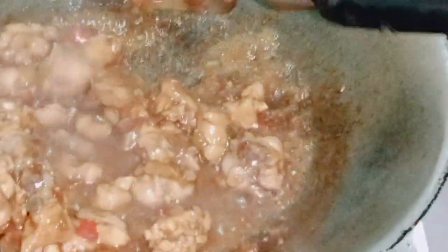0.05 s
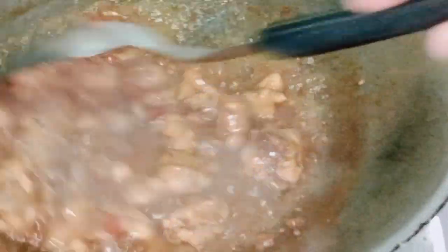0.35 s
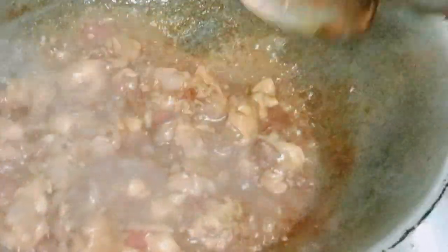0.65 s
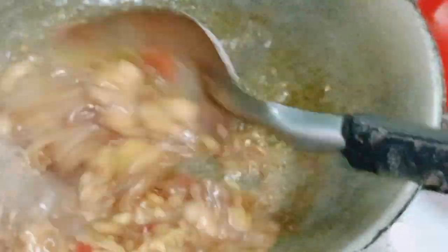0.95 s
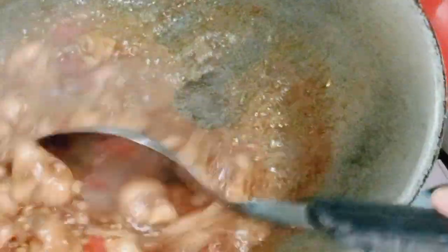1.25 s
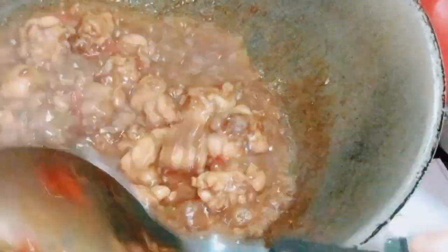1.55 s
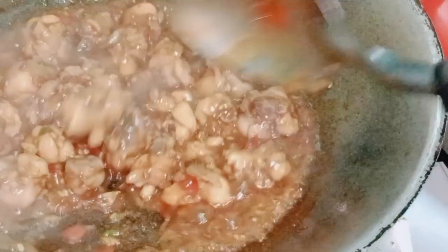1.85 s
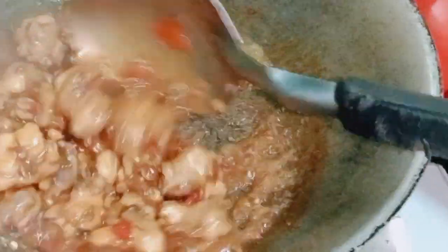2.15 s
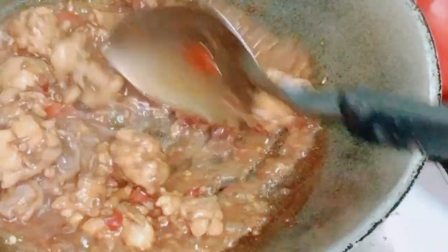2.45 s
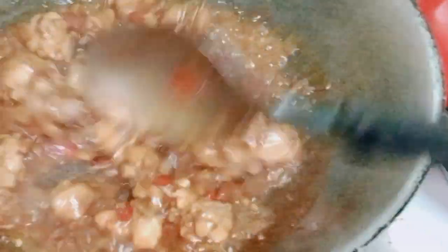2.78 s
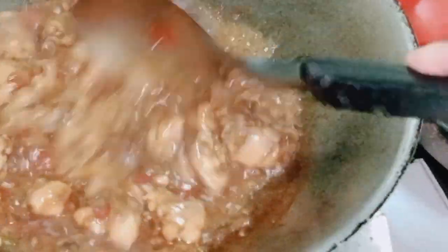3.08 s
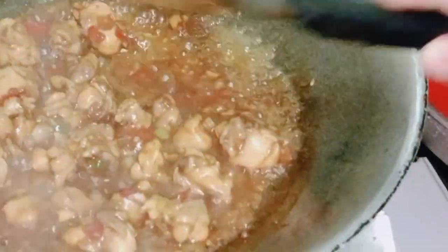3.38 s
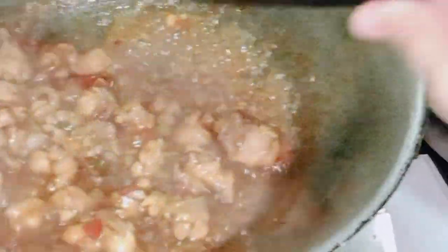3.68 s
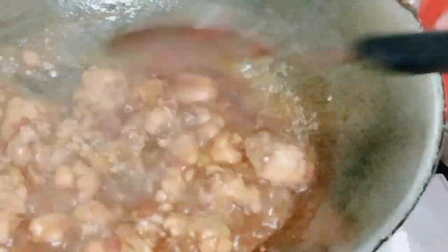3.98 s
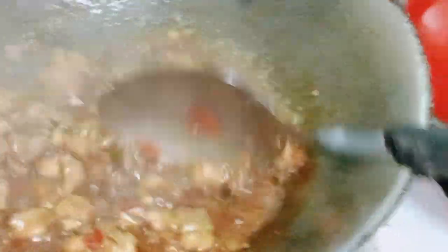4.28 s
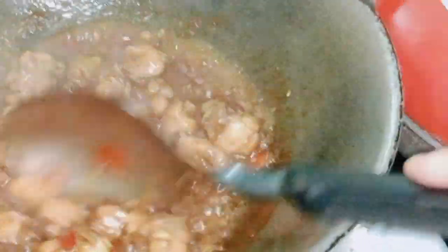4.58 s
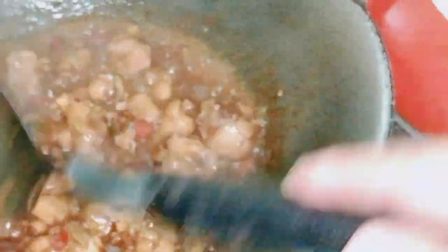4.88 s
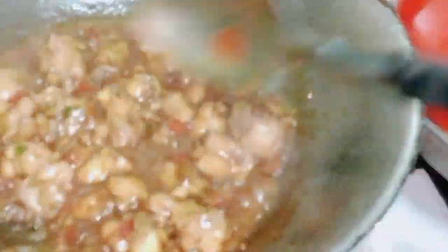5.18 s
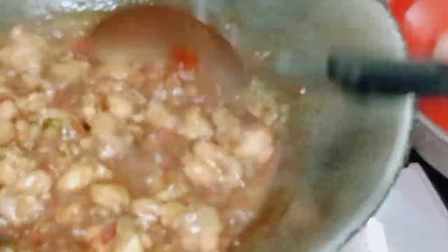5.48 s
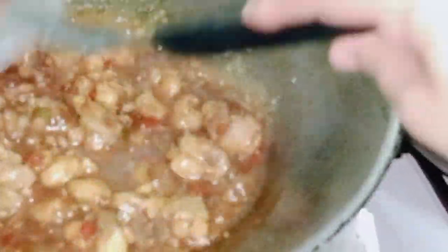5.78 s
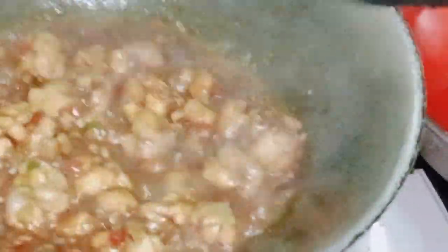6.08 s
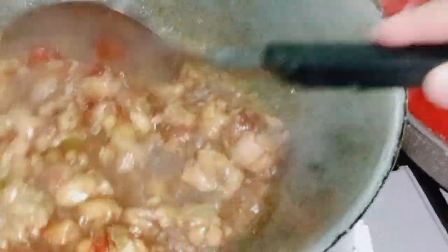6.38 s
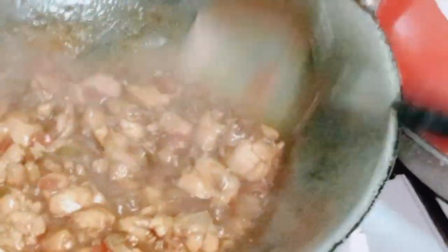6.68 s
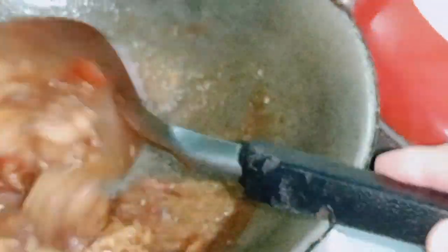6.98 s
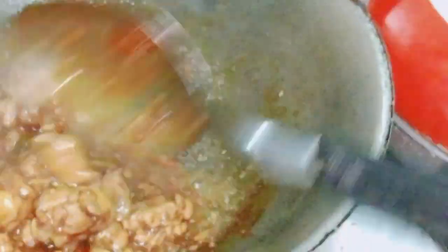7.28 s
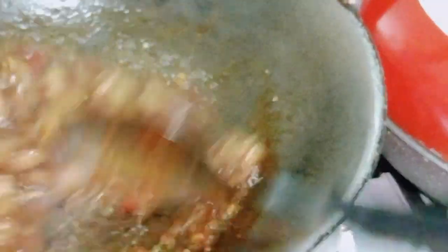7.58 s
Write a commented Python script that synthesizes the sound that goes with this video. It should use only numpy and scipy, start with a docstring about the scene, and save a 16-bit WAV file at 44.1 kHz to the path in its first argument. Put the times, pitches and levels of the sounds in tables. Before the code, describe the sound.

A steel ladle stirs chicken in a wok, close to the microphone in a small kitchen. Light knocks and a scrape come first, then a cluster of louder clanks. Single ringing knocks follow about a second apart, and more knocks and scrapes close the stirring. Lumps of meat plop into the sauce now and then. Underneath, soft bubbling and a faint high sizzle swell with the strokes.

```python
"""Light knocks and a scrape come first: a steel ladle stirs chicken in a wok, close by, in a small kitchen.
Each knock makes the pan ring, less when the ladle presses on its bare wall, and the room echoes.
The ladle scrapes by sticking and slipping over the steel, and lumps of meat plop into the sauce.
Underneath, bubbles burst softly and fat sizzles at the hot rim; both swell when the ladle stirs."""
import sys
import numpy as np
from scipy import signal
from scipy.io import wavfile

SR = 44100
rng = np.random.default_rng(int(sys.argv[2]) if len(sys.argv) > 2 else 0)


def master_out(mix):
    """Clip the mix to full scale and print it as 16-bit PCM to the path in sys.argv[1]."""
    frames = np.transpose(np.atleast_2d(mix))
    ceiling = np.clip(frames, -1, 1)
    pcm = np.round(ceiling * 32767).astype(np.int16)
    wavfile.write(sys.argv[1], SR, pcm)


N = 337365

# The steady rush of the kitchen. Each row: frequency in Hz, relative level in dB.
RUSH_TONE = [(25, -50), (50, -18), (100, -2), (250, -1.5), (330, 6), (400, 4.5), (480, 1.5), (800, 1.5),
             (1400, -1.5), (3000, -50)]
# Echoes of pan and kitchen. Each row: frequency in Hz, seconds to fade by 60 dB.
ECHO_TIMES = [(100, 0.51), (250, 0.35), (700, 0.3), (1800, 0.38), (5000, .31), (13000, 0.43)]
# Sweeps of the ladle through the sauce. Each row: start in seconds, length in seconds, squelch in dB.
SAUCE_SWEEPS = [(0.080, 0.37, -55.5), (0.598, 0.27, -50), (0.900, 0.72, -55.5), (1.763, 0.64, -59),
                (2.150, 0.94, -60), (2.942, 0.17, -58), (4.053, 0.36, -63), (4.424, 0.23, -61.5),
                (5.01, 0.54, -60.5), (6.525, 0.49, -49.5), (6.94, 0.37, -58), (7.38, 0.29, -47)]
# Fat frying at the rim. Each row: frequency in Hz, relative level in dB.
SIZZLE_TONE = [(1000, -32), (3500, -20), (4400, -19.5), (5200, -24.5), (6100, -22.5), (6400, -2), (7500, 1),
               (8900, -1.5), (9400, -6), (10100, -3), (11500, -11), (12700, -6.5), (14000, -14),
               (15400, -9.5)]
# Small bubbles bursting in the sauce. Each row: frequency in Hz, relative level in dB.
BUBBLE_TONE = [(300, 0.5), (900, -24), (1250, -8), (1550, -1), (2100, -5.5), (2650, -0.5), (3000, -6),
               (3500, -8.5), (4600, -43)]
# Meat dropping into the sauce. Each row: start in seconds, pitch in Hz, level in dB.
MEAT_DROPS = [(0.283, 326, -71), (1.33, 355, -46), (1.885, 480, -50), (2.226, 122, -60),
              (2.285, 368, -50.5), (2.470, 131, -72), (4.26, 330, -49.5), (4.601, 301, -65.5),
              (6.779, 358, -46), (7.004, 194, -66.5), (7.560, 184, -44.5)]
# The wok's own ringing notes. Each row: pitch in Hz, relative level in dB, seconds to fade by 60 dB.
WOK_NOTES = [(178, -4, 0.55), (240, -32, 1), (510, 0.5, 0.82), (632, 5.5, 0.4), (747, 11, 0.33),
             (970, 9.5, 0.49), (1040, -7, 0.62), (1077, 16, 0.073), (1213, 6, 0.53), (1296, 8, 0.23),
             (1410, 6.5, 0.36), (1718, 11, 0.21), (1990, 3, 0.55), (2263, 6, 0.17), (4330, -2.5, 0.37),
             (7250, -10.5, 0.15), (7434, -13, .2)]
# Pan and ladle, struck through food. Each row: frequency in Hz, relative level in dB.
FOOD_TONE = [(20, -80), (60, -16.5), (120, -15.5), (190, -7), (420, 1.5), (700, 4.5), (1100, 6),
             (1600, -4.5), (2400, -13), (3300, -21.5), (4100, -14.5), (5200, -13), (7300, -3),
             (15500, -23.5)]
# The wok's damped notes while the ladle presses on its bare wall.
# Each row: pitch in Hz, width in Hz, relative level in dB.
WALL_PEAKS = [(246, 230, -1.5), (631, 94, 7), (985, 75, -8), (1590, 190, -7.5), (1768, 57, -2.5),
              (2064, 123, -8), (2466, 236, -5), (2980, 190, -9), (3230, 84, -10.5), (3270, 68, -7),
              (3720, 180, -9), (4430, 110, -10.5), (6850, 2840, -11.5), (12600, 5600, -26)]
# Drags of the ladle. Each row: start in seconds, length in seconds, level in dB, low thud in dB,
# bright tick in dB, share of bare wok wall touched from 0 to 1.
LADLE_DRAGS = [(0.124, 0.094, -45, 6.5, 7.5, 0.26), (0.587, 0.18, -52, 5.5, -3.5, 0.94),
               (1.275, 0.11, -44.5, 12, -8.5, 0.05), (1.402, 0.18, -55, 19, -2, 0.06),
               (1.884, 0.077, -55, 21, -21, 0.2), (2.273, 0.082, -49, 20.5, -4.5, 0.15),
               (3.343, 0.07, -57, 2, 8, 0.4), (4.523, 0.14, -66.5, 20.5, -9, 0),
               (5.254, 0.073, -54.5, 10, 5.5, 1), (6.162, 0.071, -46.5, 4, -1, 0.6),
               (6.542, 0.19, -59.5, 13.5, 5, 0.5), (6.766, 0.14, -45.5, 14.5, -8.5, 0.19),
               (7.512, .11, -38, 16, -14, 0.08)]
# Knocks of the ladle. Each row: start in seconds, level in dB, low thud in dB, bright tick in dB,
# share of bare wok wall touched from 0 to 1, pitch in Hz that the struck spot favours.
LADLE_KNOCKS = [(0.072, -51.5, 11.5, -1.5, 0.75, 655), (0.198, -44, -4, -9, 0.43, 730),
                (0.575, -62, 20.5, 6, 0.4, 2260), (1.163, -50.5, 7, -9, 0.6, 563),
                (1.19, -41, 7, -7.5, 0.63, 620), (1.261, -32.5, 15.5, -9, 0.26, 820),
                (1.380, -42, 17, -25, 0, 640), (1.5009, -26.5, 5, 5, 0.12, 1070),
                (1.8624, -42.5, 8.5, 7.5, .87, 1700), (2.890, -81.5, -4, 28.5, .7, 1890),
                (3.288, -49, 2.5, 8.5, 0.77, 676), (3.356, -41, 4.5, -9, 0.59, 713),
                (3.7362, -27.5, 5, -2, 0.35, 2280), (4.256, -49.5, 6, -12, 0.21, 786),
                (4.884, -29, 7.5, 4, 0.04, 980), (5.2318, -54, 8, 19, 1, 2060),
                (5.299, -55.5, 6, 6.5, 1, 2140), (5.7438, -31.5, 6.5, 0, 0.28, 752),
                (6.157, -53, -6, 15, 1, 660), (6.510, -47.5, 6.5, 12.5, 0.98, 1770),
                (6.703, -75.5, -4, 19, .5, 2015), (6.758, -36, 10.5, -15, 0.1, 800),
                (6.843, -43, 17.5, -23, 0, 694), (7.3606, -26, 1, -5.5, 0.08, 745),
                (7.504, -44, 7, 2, 0.93, 1400), (7.535, -38, 13, -8, 0.1, 1410)]

RASP_PER_TICK = 0.42  # dB of mid rasp that come with each dB of bright tick


def amp(db):
    """Turns decibels into a number to multiply by."""
    return 10 ** (np.asarray(db) / 20)


def rms(x):
    """The average strength of a sound (root mean square)."""
    return np.sqrt(np.mean(x ** 2) + 1e-20)


def look_up(points, hz):
    """Reads between the rows of a (Hz, value) table, on a scale of octaves."""
    f, value = np.transpose(points)
    return np.interp(np.log(hz + 1), np.log(f + 1), value)


def add(mix, start_s, sound):
    """Mixes a sound in at its start time."""
    part = mix[max(round(start_s * SR), 0):][:len(sound)]
    part += sound[:len(part)]


def colour(x, *tones, size=4096):
    """Shapes a sound with (Hz, dB) tables, using a filter that never rings ahead of the sound."""
    hz = abs(np.fft.fftfreq(size, 1 / SR))
    log_gain = np.log(amp(sum(look_up(points, hz) for points in tones)))
    spectrum = np.exp(np.conj(signal.hilbert(log_gain)))
    taps = np.fft.ifft(spectrum).real[:size // 2]
    return signal.oaconvolve(x, taps)[:len(x)]


def resonate(x, hz, width_hz):
    """Picks out a narrow band around the moving pitch hz."""
    turn = np.exp(2j * np.pi * np.cumsum(hz) / SR)
    decay = np.exp(-np.pi * width_hz / SR)
    return 2 * (turn * signal.lfilter([1 - decay], [1, -decay], x / turn)).real


def clicks(count, per_s, spread_db):
    """Clicks at random times, a few of them large."""
    size = amp(spread_db * np.minimum(rng.exponential(1, count), 4)) * rng.choice([-1, 1], count)
    return size * (rng.random(count) < per_s / SR)


def kitchen(level_db=-72):
    """The soft rush of the stove and the room."""
    rush = colour(rng.standard_normal(N), RUSH_TONE)
    return amp(level_db) * rush / rms(rush)


def echoes(build_cycles=7):
    """Crowded echoes of pan and kitchen: low pitches swell later, and each fades at its own speed."""
    count = SR * 3 // 4
    hz, t, noise = signal.stft(rng.standard_normal(count), SR, nperseg=256)
    swell = 1 - np.exp(-np.outer(hz + hz[1], t + t[1]) / build_cycles)
    fade = amp(-60 * t / look_up(ECHO_TIMES, hz)[:, None])
    sound = signal.istft(noise * swell * fade, SR, nperseg=256)[1][:count]
    return sound / np.linalg.norm(sound)


def stirring(jostle=0.13, jostle_db=1.9, jostles_per_s=14):
    """The ladle dips in and out, jostled by lumps: gives its depth (about 0-1) and squelch strength."""
    depth, squelch = np.zeros(N), np.zeros(N)
    for start_s, length_s, level_db in SAUCE_SWEEPS:
        arch = np.sin(np.linspace(0, np.pi, round(length_s * SR)))
        add(depth, start_s, arch)
        add(squelch, start_s, amp(level_db) * arch)
    lumps = np.interp(np.arange(N) / SR * jostles_per_s, np.arange(400), rng.standard_normal(400))
    return np.minimum(depth, 1) + jostle * lumps, squelch * amp(jostle_db * lumps)


def sizzle(squelch, start_db=-54.5, db_per_s=-0.5, flare_db=-1, echo_db=-1):
    """Fat spits thousands of times a second at the hot rim, blurred by the room."""
    spits = clicks(N, per_s=4400, spread_db=3)
    spits = colour(spits + amp(echo_db) * signal.oaconvolve(spits, echoes())[:N], SIZZLE_TONE)
    calm = amp(start_db + db_per_s * np.arange(N) / SR)  # the rim calms as sauce wets it
    flare = amp(flare_db) * squelch  # a sweep pushes sauce over hot steel
    return np.hypot(calm, flare) * spits / rms(spits)


def simmer(depth, squelch, rest_db=-64.5, cycles=8, clump_db=3, echo_db=2, hollow_db=5):
    """Bubbles of many sizes burst in clumps, each a short fading note; stirring makes them louder."""
    t, pops = np.arange(SR // 50) / SR, np.zeros(N)
    for hz in np.geomspace(700, 4400, 20):
        clumps = np.interp(np.linspace(0, 60, N), np.arange(61), amp(clump_db * rng.standard_normal(61)))
        note = np.sqrt(hz) * np.exp(-t * hz / cycles) * np.sin(2 * np.pi * hz * t)
        pops += signal.oaconvolve(clumps * clicks(N, per_s=90, spread_db=2), note)[:N]
    pops = colour(pops + amp(echo_db) * signal.oaconvolve(pops, echoes())[:N], BUBBLE_TONE)
    hollow_hz = 1993 + 460 * depth  # the hollow between ladle and sauce rises in pitch in mid-sweep
    pops = pops + amp(hollow_db) * resonate(pops, hollow_hz, width_hz=260)
    return np.hypot(amp(rest_db), squelch) * pops / rms(pops)


def plop(hz, level_db, cycles=4, rise_per_s=2.55):
    """A pocket of air under the meat rings for a moment, rising in pitch as it closes."""
    t = np.arange(SR // 10) / SR
    loudness = (1 - np.exp(-t * hz)) * np.exp(-t * hz / cycles)
    note = loudness * np.sin(2 * np.pi * hz * t * (1 + rise_per_s * t))
    response = echoes()
    response[0] += 1  # the direct sound
    sound = signal.fftconvolve(note, response)
    return amp(level_db) * sound / rms(sound[:len(t)])


def body_level(x):
    """The strength of a sound from 450 to 1400 Hz, where the pan is mainly heard."""
    return rms(signal.sosfilt(signal.butter(4, [450, 1400], "band", fs=SR, output="sos"), x))


def pan_tone(wall):
    """The pan sounds smooth through food and hollow on its bare wall; gives (Hz, dB) rows."""
    f = np.geomspace(20, 16000, 700)
    hz, width_hz, db = np.transpose(WALL_PEAKS)[:, :, None]
    peaks = amp(db) ** 2 / (1 + ((f - hz) / width_hz) ** 2 / 2) ** 4
    wall_db, food_db = 10 * np.log10(peaks.sum(0)), look_up(FOOD_TONE, f)
    lowest_hz = WALL_PEAKS[0][0]  # the pan gives off no deep bass
    wall_db += np.minimum(food_db - look_up(FOOD_TONE, lowest_hz), 0) * (f < lowest_hz)
    return np.transpose([f, wall * wall_db + (1 - wall) * food_db])


def spot_tone():
    """Each spot on the pan wakes some of its many notes and misses others; gives (Hz, dB) rows."""
    f = np.arange(150, 16000, 85.)
    spread_db = 4.5 * look_up([(150, .6), (500, 1), (4500, 1), (8000, .5)], f)
    return np.transpose([f, spread_db * np.clip(rng.standard_normal(len(f)), -2, 1.5)])


def softness(thud_db, tick_db):
    """How soft a touch is, from 0 (all tick) to 1 (all thud)."""
    return np.clip((thud_db - tick_db) / 20, 0, 1)


def contact_tone(thud_db, rasp_db, tick_db, soft_dip_db=-7):
    """Soft touches thud and bare steel ticks; with soft touches the sound also dips near 5 kHz. Gives (Hz, dB)
    rows."""
    edge_db = min(rasp_db, tick_db) + soft_dip_db * softness(thud_db, tick_db)
    return [(260, thud_db), (600, 0), (1150, 0), (2100, rasp_db), (3400, rasp_db),
            (5200, edge_db), (7000, tick_db)]


def soft_start(t, thud_db, tick_db, steel_s=0.00016, food_s=0.0014):
    """Bare steel meets at once; food in between makes the contact slower."""
    return 1.5 - np.exp(-t / (steel_s + food_s * softness(thud_db, tick_db) ** 2))


def wok_ring(spot_hz, reach_octaves=0.11, others_db=-7, others_life=0.57):
    """The struck wok rings; notes near the spot's own pitch ring harder and longer."""
    t = np.arange(SR * 3 // 4) / SR
    hz, db, fade_s = np.transpose(WOK_NOTES)[:, :, None]
    near = np.exp(-(np.log2(hz / spot_hz) / reach_octaves) ** 2)
    fade_s = fade_s * (near + others_life * (1 - near))
    waves = np.sin(2 * np.pi * (hz * t + rng.random(hz.shape)))
    return (amp(db + others_db * (3 - near)) * amp(-60 * t / fade_s) * waves).sum(0)


def drag(length_s, level_db, thud_db, tick_db, wall, grit_db=3, ring_db=-7, lumps_per_s=60, lump_db=-1):
    """The ladle sticks and slips over the pan as its pressure swells, jolts over lumps and lets go."""
    count = round(length_s * SR)
    t = np.arange(count) / SR
    jolts = np.interp(t * lumps_per_s, np.arange(64), rng.uniform(-1, 1, 64))
    pressure = np.interp(t / length_s, [0, .51, 1], [.15, 1, .1]) * amp(lump_db * jolts)
    slips = pressure * clicks(count, per_s=600, spread_db=3.5)
    response = echoes()
    response[0] += 1  # the direct sound
    response = colour(response, pan_tone(wall), spot_tone())
    ring = wok_ring(spot_hz=800)
    response = response / body_level(response) + amp(ring_db) * ring / body_level(ring)
    rasp_db = grit_db + RASP_PER_TICK * tick_db
    sound = colour(signal.fftconvolve(slips, response), contact_tone(thud_db, rasp_db, tick_db))
    return amp(level_db) * sound / body_level(sound[:count])


def knock(level_db, thud_db, tick_db, wall, spot_hz, chatter_s=0.008, ring_db=9, damping_db=-9):
    """The ladle's edge chatters on the steel; the pan rings, less when pressed, and the room answers."""
    room = colour(echoes(), [(3000, 1), (7000, -2.6), (14000, -1.9)])  # the kitchen soaks up the treble
    t = np.arange(len(room)) / SR
    crack = rng.standard_normal(len(t)) * np.exp(-t / chatter_s)
    crack = colour(crack / np.linalg.norm(crack), [(200, -21), (1000, -8), (7000, -1.5)])  # little bass
    clank = colour(crack + room, pan_tone(wall), spot_tone())
    head = SR * 6 // 100  # the first 60 ms set the level
    sound = clank / body_level(clank[:head]) + amp(ring_db + damping_db * wall) * wok_ring(spot_hz)
    rasp_db = RASP_PER_TICK * tick_db + 0.3858 * (level_db + 34)  # harder knocks are raspier
    sound = colour(sound * soft_start(t, thud_db, tick_db), contact_tone(thud_db, rasp_db, tick_db))
    return amp(level_db) * sound / body_level(sound[:head])


def ladle():
    """All the knocks and drags, and the meat that they tip over."""
    mix = np.zeros(N)
    for source, rows in (knock, LADLE_KNOCKS), (drag, LADLE_DRAGS), (plop, MEAT_DROPS):
        for start_s, *settings in rows:
            add(mix, start_s, source(*settings))
    return mix


def scene():
    """Ladle, sauce and kitchen together in one channel."""
    depth, squelch = stirring()
    return (ladle() + sizzle(squelch) + simmer(depth, squelch) + kitchen())[None]


def record(dry, dip_db=-16, low_cut_hz=55, high_cut_hz=15650):
    """The microphone has a narrow dip near 4900 Hz; the deep bass and the highest treble are cut."""
    heard = colour(dry[0], [(4500, 0), (4750, dip_db), (4950, dip_db), (5300, 0)])
    heard = signal.sosfilt(signal.butter(2, low_cut_hz, "high", fs=SR, output="sos"), heard)
    treble_cut = signal.firwin(511, high_cut_hz, window=("kaiser", 9), fs=SR)
    return signal.oaconvolve(heard, treble_cut, "same")[None]


dry = scene()
out = record(dry)
master_out(out)
```